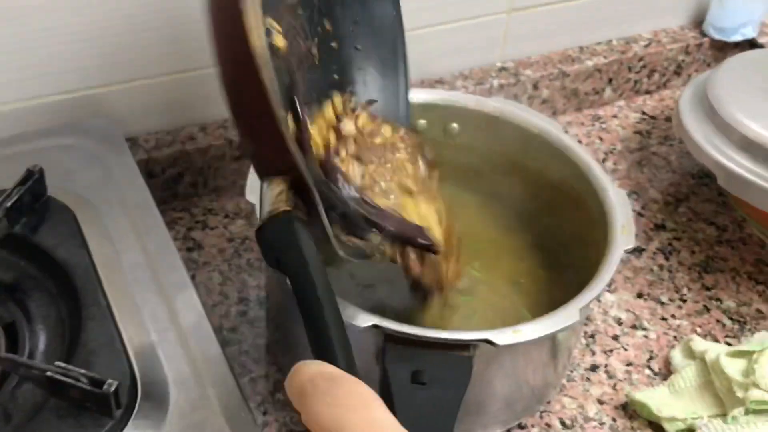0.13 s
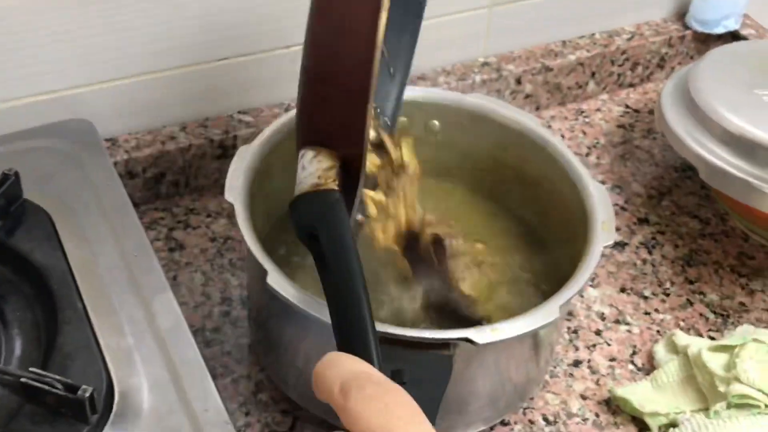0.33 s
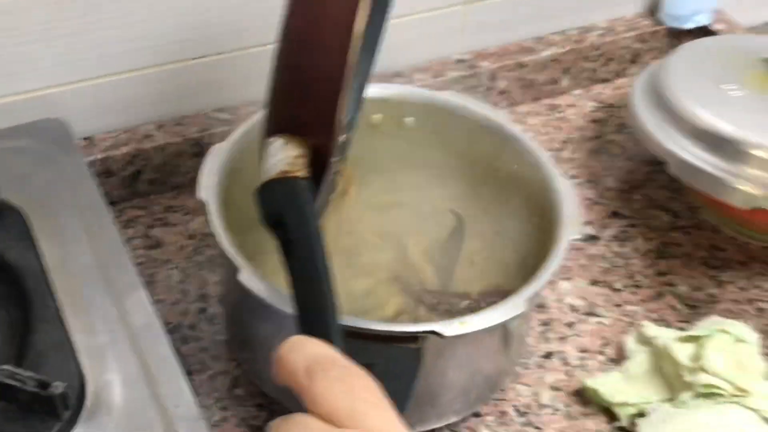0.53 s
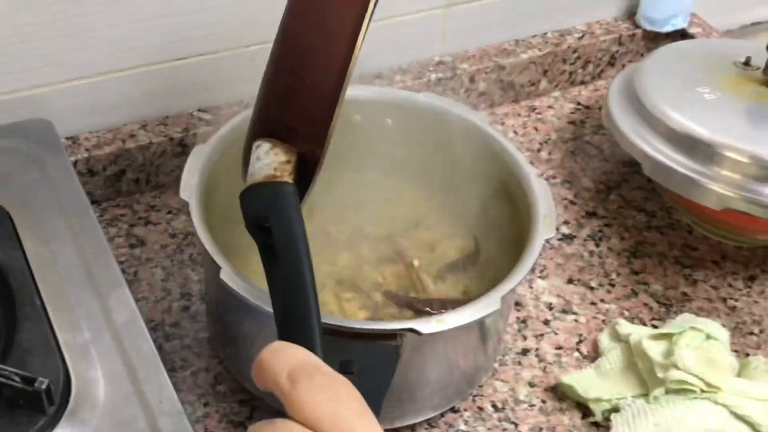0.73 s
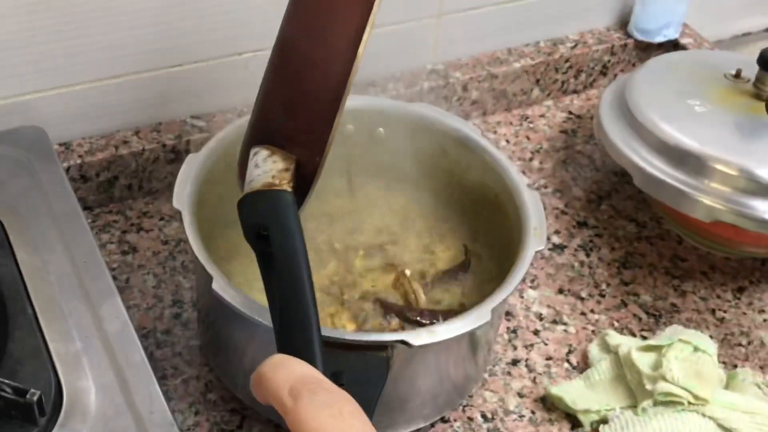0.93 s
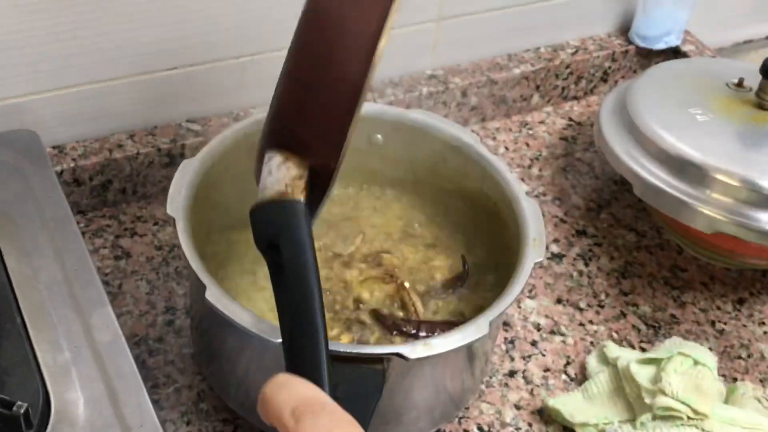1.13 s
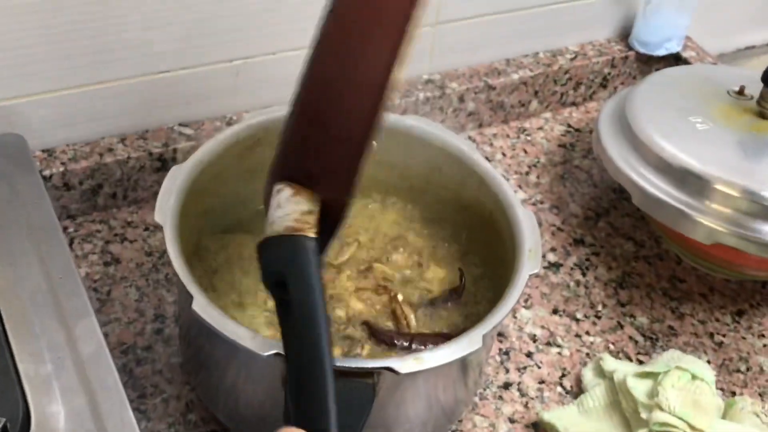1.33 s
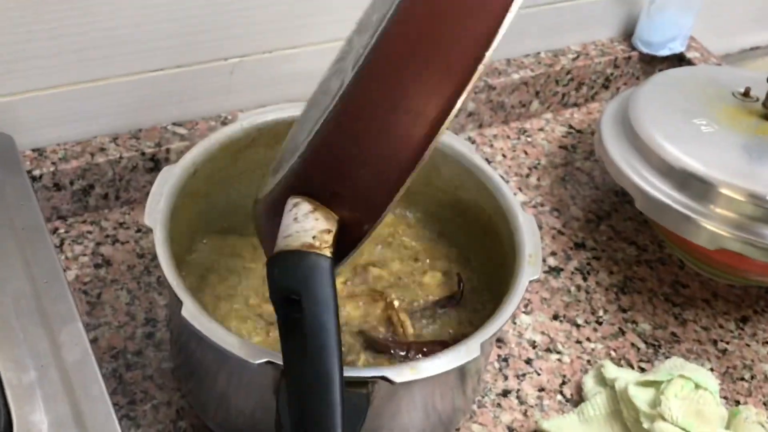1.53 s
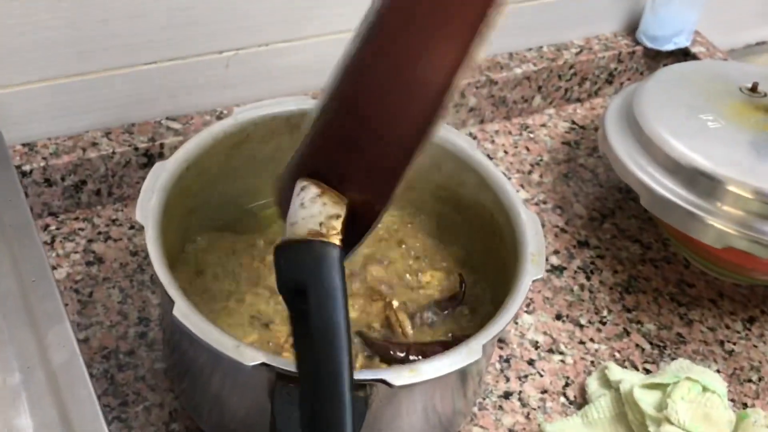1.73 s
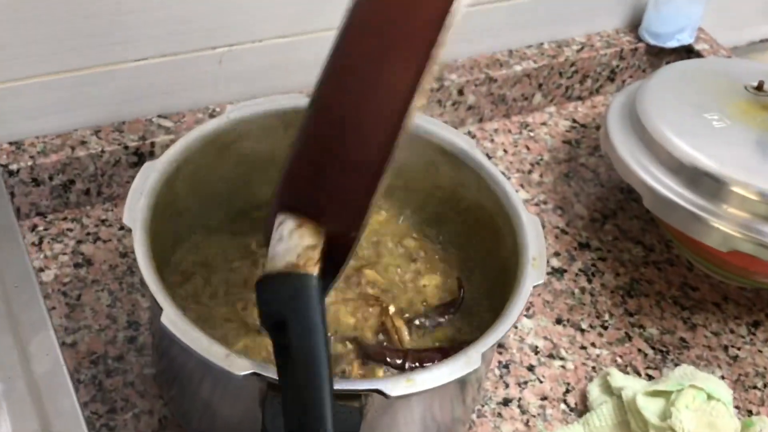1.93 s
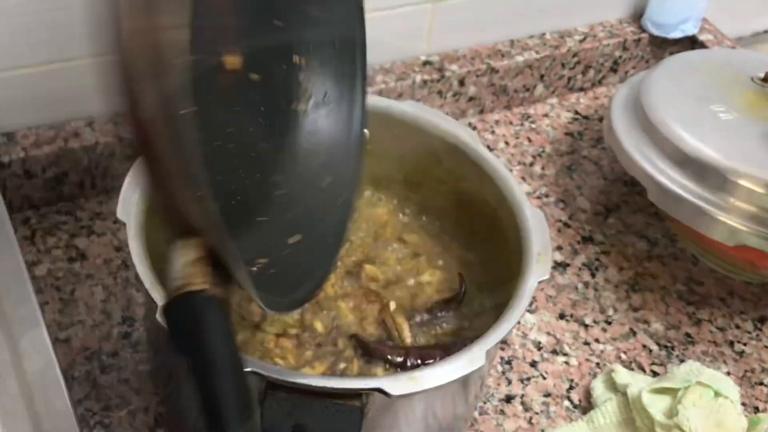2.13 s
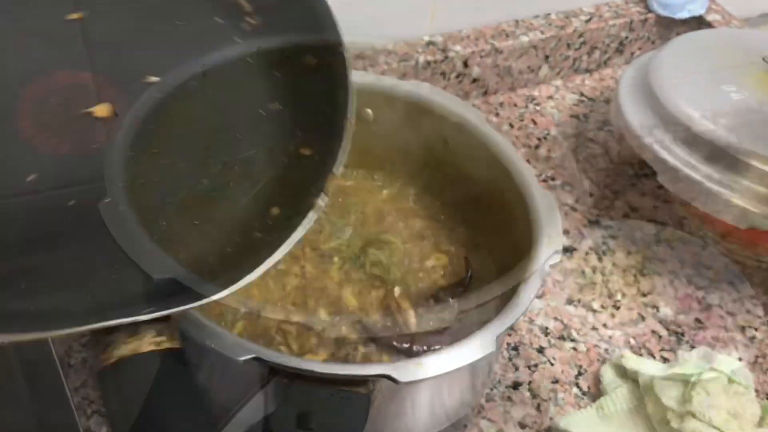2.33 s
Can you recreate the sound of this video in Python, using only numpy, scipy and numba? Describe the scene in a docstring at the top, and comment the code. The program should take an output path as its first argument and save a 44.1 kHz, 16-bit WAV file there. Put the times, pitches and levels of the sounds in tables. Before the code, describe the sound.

Loud sizzle as hot oil and fried spices hit wet lentils, then slowly thinning to crackle

```python
"""A faint fizz comes first; then hot oil and fried spices slide from a pan into a pot of wet lentils.
The sizzle, thousands of bursting steam bubbles a second over hiss, flares up within half a second and thins.
Resonant bands give the ringing air between pan and pot; single damped sines pop throughout.
Larger bubbles gurgle below, filtered noise makes the kitchen's faint rumble, and a phone hears it in mono."""
import sys
import numpy as np
from scipy import signal
from scipy.fft import rfft, irfft
from scipy.io import wavfile
from scipy.ndimage import uniform_filter1d
from numba import njit

SR = 44100
rng = np.random.default_rng(int(sys.argv[2]) if len(sys.argv) > 2 else 0)


def persist_wave(psi):
    """Save psi, clipped to +-1, as 16-bit WAV."""
    counts = np.round(np.clip(psi, -1, 1) * 32767).astype(np.int16)
    wavfile.write(sys.argv[1], SR, np.atleast_2d(counts).T)


N = 105840  # samples, 2.4 s

# Sizzle and ringing air between pan and pot. Each row: time in seconds, sizzle level in dB, ring in Hz,
# ring gain in dB, upper ring in Hz, upper ring gain in dB, low fizz in dB relative to the sizzle level.
SIZZLE_COURSE = [(0, -40.5, 1420, 6, 2750, -1, -24), (.135, -41.5, 1350, 6.5, 2750, -4, -13),
                 (.16, -29, 1300, -12, 2750, 3, -22), (.2, -24, 1270, 11.5, 2780, 5, -16),
                 (.245, -14, 1270, 4, 3000, 9, -12.5), (.3, -13, 1310, 9, 2700, 5.5, -13.5),
                 (.39, -10, 1390, 6.5, 2760, 1.5, -17.5), (.45, -11.5, 1450, 6.5, 2900, 4.5, -18),
                 (.5, -13.5, 1460, 10, 3020, 7.5, -18), (.6, -16.5, 1530, 8, 2930, 7.5, -20),
                 (.76, -17.5, 1600, 10.5, 3020, 4.5, -18), (.9, -17, 1490, 6.5, 2770, 3.5, -20),
                 (1.14, -18.5, 1440, 8, 2680, 1, -22), (1.3, -20.5, 1350, 9, 2540, 4.5, -22),
                 (1.6, -22, 1380, 5.5, 2630, 2, -23), (1.95, -23.5, 1340, 0.5, 2850, 2.5, -24),
                 (2.15, -26.5, 1360, 3.5, 2770, 2.5, -23), (2.28, -28, 1340, 8.5, 2900, 1, -25),
                 (2.34, -30, 1350, 5, 2940, 5, -24), (2.4, -31, 1350, -7, 2900, 2, -21)]
# Sizzle gain below MIDS_EDGE_HZ. Each row: time in seconds, gain in dB.
MIDS_GAIN = [(0, 2.5), (.13, 3.5), (.145, -7), (.175, -1), (.2, 0), (1.2, 0), (2.1, 1.5), (2.25, -2),
             (2.4, 1)]
# Spectral colour of the sizzle. Each row: frequency in Hz, gain in dB.
SIZZLE_COLOUR = [(300, -37), (700, -16), (1200, -5.5), (2300, -2.5), (4000, -0.5), (6500, -0.5), (9000, -1),
                 (12000, 0.5), (14200, 1), (15700, 0)]
# Peaks and dips from pot wall and worktop. Each row: centre in Hz, width in Hz, gain in dB.
POT_RESONANCES = [(1894, 210, -5), (3470, 160, -1.5), (4370, 230, 3), (4900, 520, -2), (6200, 560, 1),
                  (7700, 330, -4.5), (10430, 380, -6), (13600, 440, -1.5)]
# Spectral colour of the low fizz. Each row: frequency in Hz, gain in dB.
LOW_FIZZ_COLOUR = [(450, -19.5), (550, -11), (600, -5.5), (650, -0.5), (700, -15), (765, 0.5), (880, -5.5),
                   (1000, -1.5), (1300, -31)]
# Loudest single bursts. Each row: start in seconds, size in dB before filtering, starting pitch in Hz.
LOUD_POPS = [(.0288, -19, 9200), (.143, -22, 14700), (.1675, -15, 7000), (0.2046, -15, 3150),
             (0.248, -13, 3050), (.252, -16, 670), (0.363, -6, 2980), (0.38, 2, 4700), (.922, -7, 2700),
             (1.049, -19, 14500), (1.1818, 4, 12500), (1.319, -5, 13300), (1.4653, 1, 12400),
             (1.9454, -12, 3400), (2.0302, -15, 2900), (2.127, -10, 6500), (2.1301, -11, 6400),
             (2.1935, -9, 9500), (2.2316, -26, 5000), (2.272, -15, 12100), (2.2808, -5, 12000),
             (2.3291, -13, 5600), (2.3865, -10, 6300)]
# Gurgle of the lentils. Each row: time in seconds, level in dB.
GURGLE_LEVEL = [(0, -57), (.2, -57.5), (.26, -42.5), (.37, -41.5), (.55, -40), (.62, -45.5), (.8, -48),
                (1.2, -52), (2.0, -55.5), (2.4, -62)]
# Spectral colour of the gurgle. Each row: frequency in Hz, gain in dB.
GURGLE_SPECTRUM = [(76, -50), (130, -20), (156, -20), (188, -12), (220, 0), (258, -5.5), (281, 0),
                   (412, -9.5), (520, -5.5), (680, -43), (1140, -120)]
# Spectral colour of the kitchen rumble. Each row: frequency in Hz, gain in dB.
RUMBLE_COLOUR = [(15, -44), (25, -20), (81, 2.5), (103, -1.5), (135, -12), (170, -7.5), (220, -10),
                 (370, -120)]

BURSTS_PER_S, BURST_CYCLES, BURST_GLIDE = 9000, 1, 0.22
BURST_SPREAD_DB, BURST_MOST_DB = 1, 13.5  # mean and greatest excess of a burst
HISS_DB = -0.5  # relative to the bursts, as are crackle and singing
CRACKLE_PER_S, CRACKLE_START_DB, CRACKLE_RISE_DB_PER_S = 450, -23, 5
SINGING_PER_S, SINGING_CYCLES, SINGING_DB = 500, 31, -12
RING_WIDTH_HZ, UPPER_WIDTH_HZ = 207, 350
MIDS_EDGE_HZ = 3170
FIRST_DROPS_S, FIRST_DROPS_DB, FIRST_DROPS_T60_S = .1390, -31.5, .08
FLICKER_DB, FLICKER_PER_S = 0.35, 25
POP_CYCLES, POPS_LOW_CUT_HZ = 2.5, 450
RUMBLE_DB = -49.5
ROOM_DB, ROOM_T60_S = -11.5, 0.31  # tail energy relative to the direct sound; time to fall 60 dB
OVERLOAD, TOP_HZ = 1.1, 15750  # saturation ceiling (linear amplitude); upper band edge


def undb(db):
    """Level law: every 20 dB is a tenfold amplitude."""
    return 10 ** (np.asarray(db) / 20)


def unit(x):
    """Normalisation of a signal to an rms of 1."""
    return x / np.sqrt(np.mean(x ** 2))


def curve(table, column):
    """Linear interpolation in time of one table column."""
    rows = np.array(table, float)
    return np.interp(np.arange(N) / SR, rows[:, 0], rows[:, column])


def colour(x, points, bumps=()):
    """Spectral filtering by (Hz, dB) points and bell-shaped resonances, to rms 1."""
    f = np.fft.rfftfreq(N, 1 / SR) + 1e-3  # the offset keeps the logarithm finite at 0 Hz
    rows = np.array(points, float)
    db = np.interp(np.log(f), np.log(rows[:, 0]), rows[:, 1])
    for hz, width, gain_db in bumps:
        db = db + gain_db / (1 + (2 * (f - hz) / width) ** 2)
    return unit(irfft(rfft(x) * undb(db), N))


@njit
def moving_resonance(x, hz, width):
    """State-variable resonance: a band-pass of gain 1 whose centre moves."""
    y, band, low = np.empty(len(x)), 0., 0.
    for i in range(len(x)):
        g, k = np.tan(np.pi * hz[i] / SR), width / hz[i]
        v = (band + g * (x[i] - low)) / (1 + g * (g + k))
        band, low, y[i] = 2 * v - band, low + 2 * g * v, k * v
    return y


@njit
def grains(n, start, hz, cycles, size, glide, sr):
    """Damped oscillation: sines rising a little in pitch that fall 20 dB in the given cycles."""
    out = np.zeros(n)
    for j in range(len(start)):
        i = int(start[j]) + 1
        t, span = (i - start[j]) / sr, cycles[j] / hz[j]
        while t < 2.5 * span and i < n:
            phase = 2 * np.pi * hz[j] * t * (1 + .2 * glide * t / span)
            out[i] += size[j] * np.exp(-2.3 * t / span) * np.sin(phase)
            i, t = i + 1, t + 1 / sr
    return out


def walk(rate):
    """Random modulation: levels drawn at the given rate and slewed, to rms 1."""
    k = int(SR / rate)
    held = np.repeat(rng.standard_normal(N // k + 1), k)
    return unit(uniform_filter1d(held, k)[:N])


def bubbles(per_s, lo_hz, hi_hz, cycles, spread_db):
    """Poisson process of bursting steam bubbles: random pitch, a few far stronger than the rest."""
    u = rng.random((40000, 4))  # columns: waiting time, pitch, strength, ringing time
    start = np.cumsum(-np.log(1 - u[:, 0])) * SR / per_s
    inside = start < N - 2
    u, start = u[inside], start[inside]
    hz = lo_hz + (hi_hz - lo_hz) * u[:, 1]
    excess_db = np.minimum(-spread_db * np.log(1 - u[:, 2]), BURST_MOST_DB)
    size = np.sqrt(hz) * undb(excess_db)
    ringing = cycles * (.5 + u[:, 3])
    return unit(grains(N, start, hz, ringing, size, 1. * BURST_GLIDE, 1. * SR))


def steam():
    """Superposition of many short bursts, broadband hiss, lone crackles and longer-singing bubbles."""
    bursts = bubbles(BURSTS_PER_S, 790.0, 15300.0, BURST_CYCLES, BURST_SPREAD_DB)
    hiss = undb(HISS_DB) * rng.standard_normal(N)
    # lone clicks stand out more as the fizz thins
    crackle_db = CRACKLE_START_DB + CRACKLE_RISE_DB_PER_S * np.arange(N) / SR
    crackle = undb(crackle_db) * bubbles(CRACKLE_PER_S, 8500.0, 15800., 2.2, 2.4)
    singing = undb(SINGING_DB) * bubbles(SINGING_PER_S, 1024.0, 15570.0, SINGING_CYCLES, 3.2)
    return bursts + hiss + crackle + singing


def air_gap(raw):
    """Cavity resonance: the air between pan and pot lifts or dips two moving bands."""
    ring = moving_resonance(raw, curve(SIZZLE_COURSE, 2), 1. * RING_WIDTH_HZ)
    upper = moving_resonance(raw, curve(SIZZLE_COURSE, 4), 1. * UPPER_WIDTH_HZ)
    ring_gain, upper_gain = undb(curve(SIZZLE_COURSE, 3)), undb(curve(SIZZLE_COURSE, 5))
    return raw + (ring_gain - 1) * ring + (upper_gain - 1) * upper


def sizzle():
    """Source and filter: steam shaped by air gap and pot, under a changing level; first drops decay alone."""
    body = colour(air_gap(steam()), SIZZLE_COLOUR, POT_RESONANCES)
    mids = signal.sosfiltfilt(signal.butter(2, MIDS_EDGE_HZ, fs=SR, output="sos"), body)
    body = body + (undb(curve(MIDS_GAIN, 1)) - 1) * mids
    low_fizz = colour(bubbles(1500., 542.0, 1035.0, 5.9, 4.5), LOW_FIZZ_COLOUR)
    low_fizz = low_fizz * undb(curve(SIZZLE_COURSE, 6))
    t = np.arange(N) / SR - FIRST_DROPS_S
    first_drops = undb(FIRST_DROPS_DB - 60 * np.maximum(t, 0) / FIRST_DROPS_T60_S) * (t > 0)
    flicker = undb(FLICKER_DB * walk(FLICKER_PER_S))
    return (body + low_fizz) * undb(curve(SIZZLE_COURSE, 1)) * flicker + body * first_drops


def pops():
    """Impulsive excitation: single loud bursts ring as damped sines, with the bass cut."""
    start_s, db, hz = np.array(LOUD_POPS, float).T
    cycles = np.full(len(start_s), 1. * POP_CYCLES)
    x = grains(N, start_s * SR, hz, cycles, undb(db), 1. * BURST_GLIDE, 1. * SR)
    return signal.sosfilt(signal.butter(4, POPS_LOW_CUT_HZ, "high", fs=SR, output="sos"), x)


def gurgle():
    """Bubble resonance: larger bubbles in the thick lentils oscillate at lower pitch."""
    raw = bubbles(1200., 165.0, 457.0, 3.0, 0.43)
    return colour(raw, GURGLE_SPECTRUM) * undb(curve(GURGLE_LEVEL, 1))


def room(x):
    """Exponential reverberation: a short noise tail off tiles and steel, balanced in energy."""
    t = np.arange(SR // 2) / SR
    tail = rng.standard_normal(len(t)) * undb(-60 * t / ROOM_T60_S)
    wet = signal.fftconvolve(x, tail / np.sqrt(np.sum(tail ** 2)))[:N]
    return (x + undb(ROOM_DB) * wet) / np.sqrt(1 + undb(2 * ROOM_DB))


def rumble():
    """Stationary random noise: the kitchen's steady low rumble, shaped by filtering."""
    return colour(rng.standard_normal(N), RUMBLE_COLOUR) * undb(RUMBLE_DB)


def scene():
    """Linear superposition of all sources, alike in both channels; only sizzle and pops get the room."""
    mono = room(sizzle() + pops()) + gurgle() + rumble()
    return np.array([mono, mono])


def record(dry):
    """Saturation and band limiting: the phone rounds the loudest peaks and cuts the top."""
    rounded = OVERLOAD * np.tanh(dry / OVERLOAD)
    edge = signal.ellip(14, .2, 60, TOP_HZ, fs=SR, output="sos")
    return signal.sosfilt(edge, signal.sosfilt(edge, rounded))  # twice for a deeper cut


dry = scene()
out = record(dry)
persist_wave(out)
```